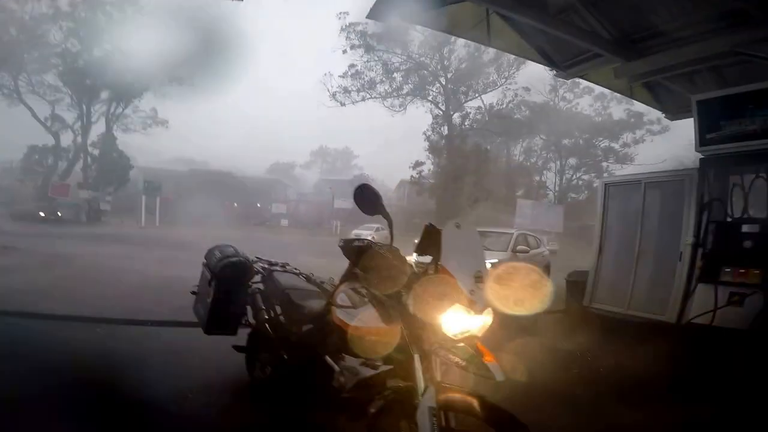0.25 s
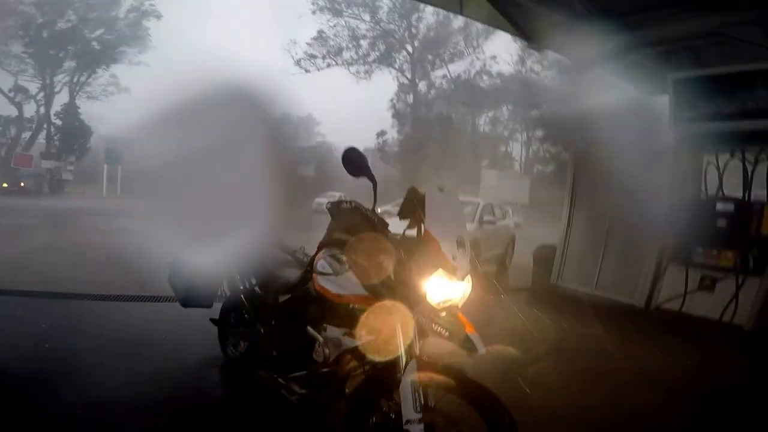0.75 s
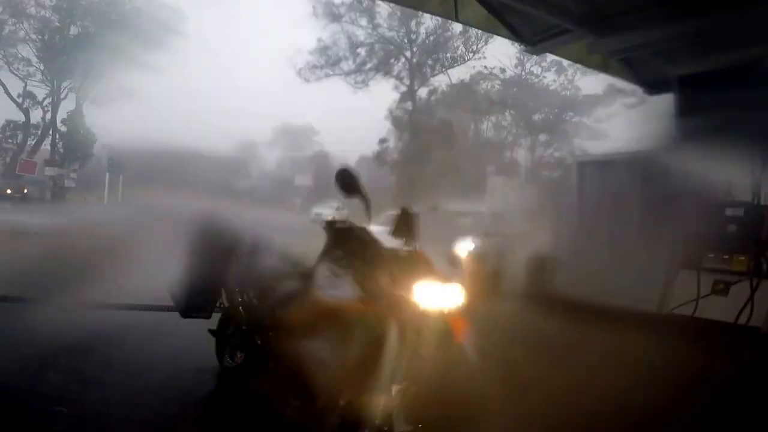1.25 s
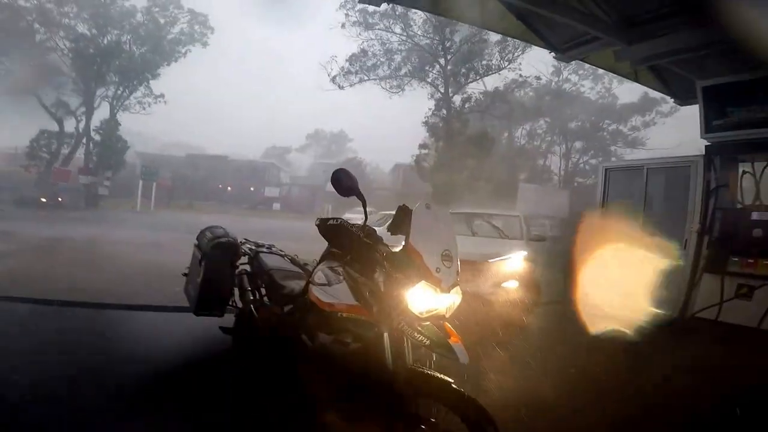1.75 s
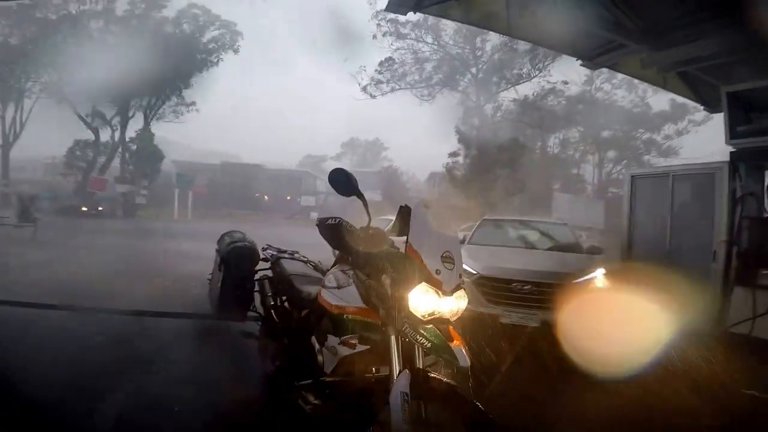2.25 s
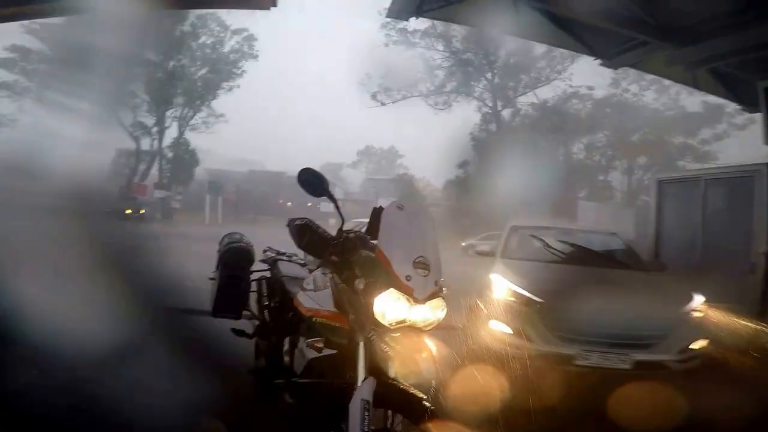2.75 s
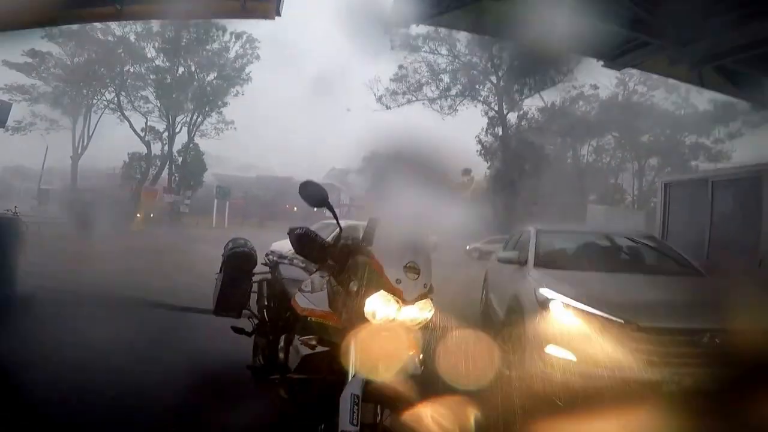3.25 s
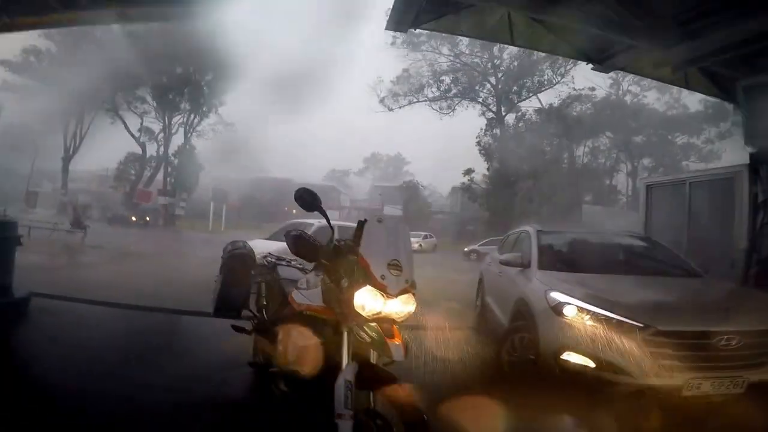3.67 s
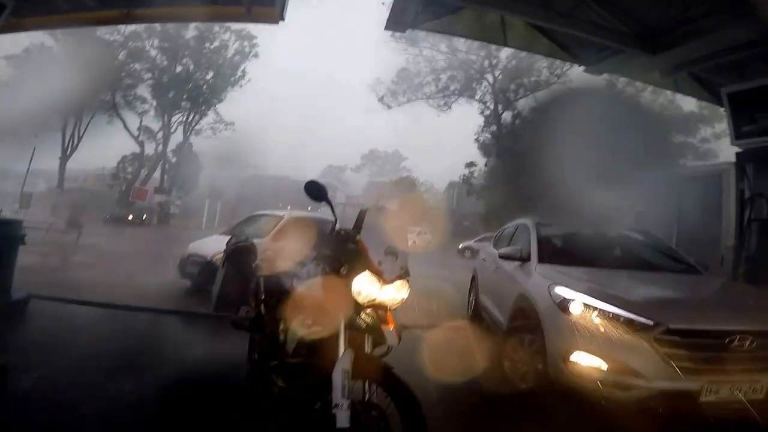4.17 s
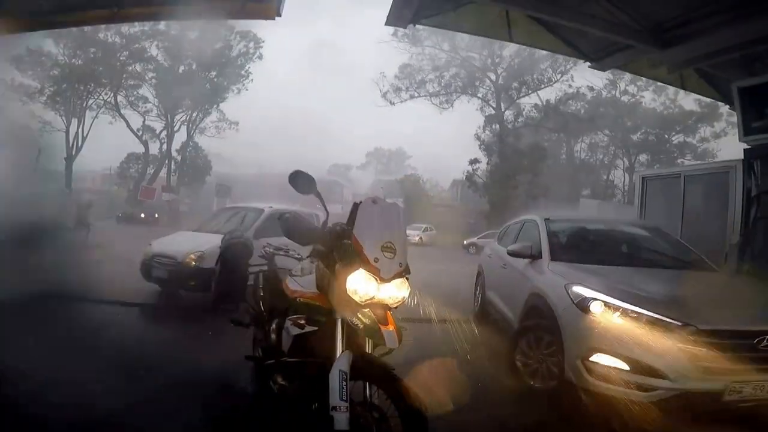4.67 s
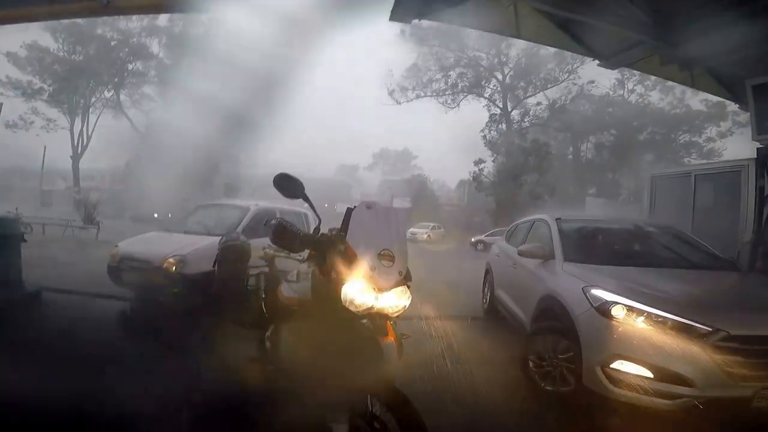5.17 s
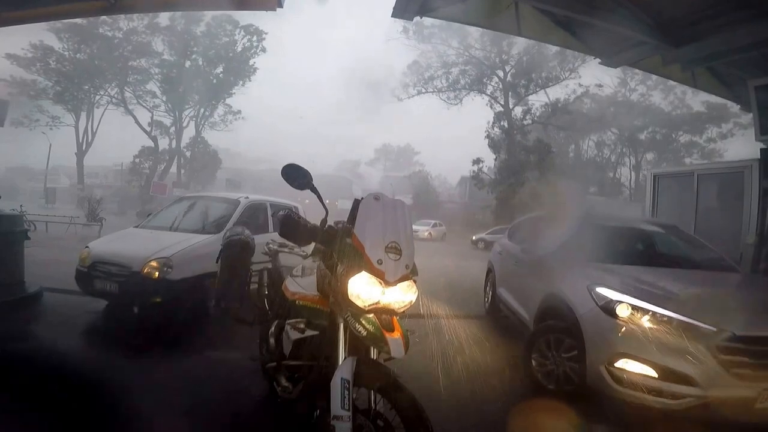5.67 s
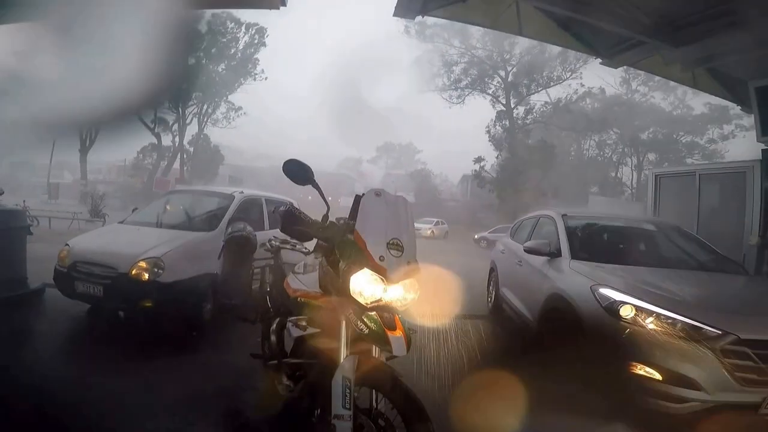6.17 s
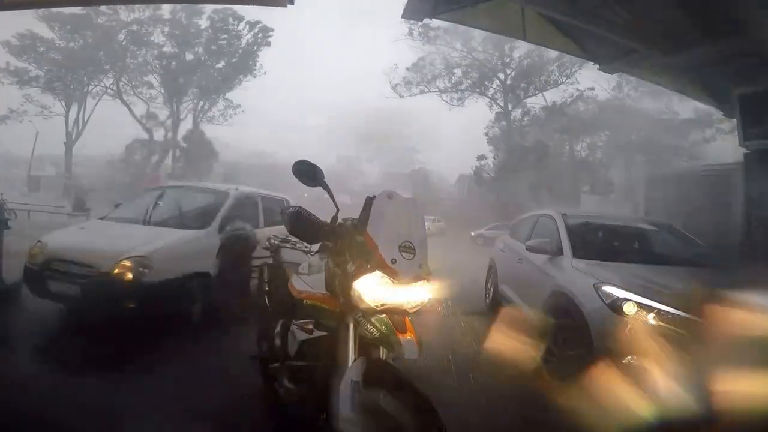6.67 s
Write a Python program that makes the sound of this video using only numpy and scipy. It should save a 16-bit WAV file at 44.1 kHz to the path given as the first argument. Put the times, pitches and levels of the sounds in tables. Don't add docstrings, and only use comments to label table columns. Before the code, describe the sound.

A dense boxy downpour roar with hail ticks and knocks, low wind buffeting, and a few violent blows that make the sound suddenly drop and recover.

```python
import sys
import numpy as np
from scipy import signal
from scipy.fft import rfft, irfft, next_fast_len
from scipy.io import wavfile
from scipy.ndimage import uniform_filter1d

SR = 44100
rng = np.random.default_rng(int(sys.argv[2]) if len(sys.argv) > 2 else 0)


def waveform_to_disk(signal):
    frames = np.transpose(np.atleast_2d(signal))
    scaled = np.clip(frames, -1, 1) * 32767
    samples = np.round(scaled).astype(np.int16)
    wavfile.write(sys.argv[1], SR, samples)


def magnitude_from_level(level_db):
    exponent = np.asarray(level_db, float) / 20
    return 10 ** exponent


N = 304731


def poisson(rate_hz, spread_db, top_db):
    when, sign, size = rng.random((3, N))
    size_db = np.minimum(-spread_db * np.log(1 - size), top_db)
    return (when < rate_hz / SR) * np.sign(sign - 0.5) * magnitude_from_level(size_db)


def colour(x, points):
    hz, db = np.transpose(points)
    size = next_fast_len(N + SR)
    log_hz = np.log(np.arange(size // 2 + 1) * SR / size + 1)
    log_gain = np.interp(log_hz, np.log(hz), db) * np.log(10) / 20
    cepstrum = irfft(log_gain, size)
    cepstrum[1:size // 2] *= 2
    cepstrum[size // 2 + 1:] = 0
    y = irfft(rfft(x, size) * np.exp(rfft(cepstrum)), size)[:N]
    return y / np.std(y)


def noise(points):
    return colour(rng.standard_normal(N), points)


def walk(rate_hz):
    hold = int(SR / rate_hz)
    steps = np.repeat(rng.standard_normal(N // hold + 1), hold)
    w = uniform_filter1d(uniform_filter1d(steps, hold), hold)[:N]
    return w / np.std(w)


def ring(x, hz, t60_s):
    pole = np.exp(2j * np.pi * hz / SR - np.log(1000) / (t60_s * SR))
    return signal.lfilter([1], [1, -pole], x).imag


def clock(length_s):
    return np.arange(int(length_s * SR)) / SR


def add(out, s, piece):
    i = int(s * SR)
    out[i:i + len(piece)] += piece[:N - i]


# (start [s], level [dB], length [s])
GUST_TABLE = [(0.01, -11.5, .17), (0.364, -8.5, 0.17), (0.833, -11.5, 0.043), (0.936, -17.5, 0.14),
              (1.184, -11.5, 0.21), (1.455, -15.5, 0.13), (1.66, -12, 0.087), (1.884, -14, .14),
              (2.062, -17.5, 0.14), (2.345, -19.5, 0.088), (2.51, -17, 0.21), (2.902, -12, 0.14),
              (3.175, -12.5, 0.028), (3.25, -17.5, 0.35), (3.636, -11.5, 0.18), (3.952, -20.5, 0.11),
              (4.183, -13, 0.14), (4.336, -16, 0.042), (4.577, -11, 0.45), (4.82, -11, 0.064),
              (5.09, -6, 0.085), (5.29, -14, 0.037), (5.407, -14, 0.04), (5.507, -16, 0.4),
              (6.18, -19, 0.084), (6.248, -11.5, 0.015), (6.36, -16, 0.046), (6.478, -11.5, 0.048),
              (6.582, -12.5, 0.072), (6.868, -13, .06)]
LULL_DB, GUST_RISE_S, GUST_FADE_S = -23, 0.016, 0.03


def gusts():
    t = np.arange(N) / SR
    power = magnitude_from_level(2 * LULL_DB)
    for s, db, length_s in GUST_TABLE:
        edge = np.minimum((t - s) / GUST_RISE_S, (s + length_s - t) / GUST_FADE_S)
        power = power + magnitude_from_level(2 * db) * np.exp(np.minimum(edge, 0))
    return np.sqrt(power)


# (frequency [Hz], level [dB per Hz])
RUMBLE_SPECTRUM = [(11, -35), (18, 1.5), (43, 2.5), (188, -14.5), (285, -18.5), (400, -22), (520, -26),
                   (880, -120)]
# (time [s], peak [dB], frequency [Hz])
BUFFETS = [(0.111, -5, 135), (0.162, -4.5, 210), (0.366, -4, 100), (0.458, -13, 136), (0.523, 1, 151),
           (0.832, -2, 120), (1.016, -6, 170), (1.097, -2.5, 151), (1.242, -4, 91.5), (1.348, 3, 92),
           (1.432, -5, 206), (1.471, -2, 131), (1.707, -6.5, 95), (1.877, -16, 104), (1.921, -5, 105),
           (2.634, -3.5, 118), (2.923, -5, 90), (3.174, -5, 98), (3.943, -10, 92), (4.243, -1.5, 95.5),
           (4.352, -4.5, 123), (4.562, -17, 165), (4.588, -2, 240), (5.076, -5, 122), (5.088, 0, 293),
           (5.422, -5, 234), (5.423, -6, 119), (6.373, -13, 127), (6.58, 0.5, 105)]
PORT_LIMIT = 0.85


def wind():
    eddies = rng.standard_normal(N) * magnitude_from_level(4.34 * walk(35)) + 12 * poisson(70, 3.7, 7.9)
    rumble = colour(eddies, RUMBLE_SPECTRUM)
    rumble = rumble / np.sqrt(uniform_filter1d(rumble ** 2, size=SR // 7) + 0.1)
    rumble = rumble - 0.19 * (np.minimum(rumble ** 2, 6.0) - 1)
    out = rumble * gusts()
    for s, db, hz in BUFFETS:
        cycles = np.arange(int(3 * SR / hz)) * hz / SR
        swing = np.sin(2 * np.pi * cycles) * cycles * np.exp(-cycles / 0.67)
        add(out, s, -2 * magnitude_from_level(db - 1) * swing)
    return PORT_LIMIT * np.tanh(out / PORT_LIMIT)


# (time [s], rattle [dB], rattle decay [s], thump [dB], thump frequency [Hz])
DIRECT_HITS = [
    (4.657, 4.5, 0.0029, 11, 42),
    (5.088, -37, .003, -17, 191),
    (5.1594, 5, 0.0014, -21, 60),
    (5.6186, 4.5, 0.0027, 5.5, 38),
    (5.7044, 19, 0.0016, -15, 61),
]


def blows():
    out, t = np.zeros(N), clock(0.08)
    bright = noise([(900, -51), (1800, -5), (2400, 0), (3200, -4), (4050, 0), (5000, -11),
                    (6000, -4), (8000, -16), (11000, -18.5), (15000, -47)])
    dull = noise([(200, -34), (600, 2), (1200, -23), (1750, -4.5), (2400, -2), (3500, -55)])
    for s, rattle_db, decay_s, thump_db, hz in DIRECT_HITS:
        i = slice(int(s * SR), int(s * SR) + len(t))
        rattle = bright[i] * np.exp(-t / (0.75 * decay_s))
        body = magnitude_from_level(-6) * dull[i] * t / decay_s * np.exp(-(t / (1.92 * decay_s)) ** 2)
        thump = np.sin(2 * np.pi * hz * t) * np.exp(-t / 0.03) * np.minimum(t / 0.0075, 1) ** 2
        add(out, s, magnitude_from_level(rattle_db) * rattle + magnitude_from_level(thump_db) * (thump + body))
    return out


# (time [s], peak [dB])
LIGHT_STONES = [(0.0313, -9), (0.407, -9), (0.679, -13), (0.9532, -7.5), (0.995, -8.5), (1.2266, -8),
                (1.5462, -12), (1.686, -5), (1.7, -6), (1.7375, -8), (1.923, -5.5), (1.9844, -9),
                (2.4155, -8), (2.538, -5), (3.082, -5), (3.2879, -9), (3.2978, -5.5), (3.348, -9),
                (4.2742, -11), (4.5204, -3), (4.805, -1), (5.4934, -18), (5.5385, -6), (5.571, -2),
                (6.2846, -27), (6.392, -3), (6.467, -15), (6.576, -2.5), (6.5999, -7), (6.6552, -10)]


def light_stones():
    out, t = np.zeros(N), clock(0.02)
    snap = noise([(3000, -26), (6500, 4), (10000, -6), (14000, -14), (16000, -40)])
    luck = rng.standard_normal((len(LIGHT_STONES), 3))
    for (s, db), (detune_low, detune_high, snap_luck) in zip(LIGHT_STONES, luck):
        low = np.sin(2 * np.pi * 2200 * (1 + 0.062 * detune_low) * t)
        high = np.sin(2 * np.pi * 2750 * (1 + 0.24 * detune_high) * t)
        knock = (low + 0.9 * high) * np.minimum(t / 0.00093, 1) * magnitude_from_level(-60 * t / 0.0077)
        burst = snap[int(s * SR):][:len(t)] * np.exp(-t / 0.0012)
        add(out, s, magnitude_from_level(db - 19 + 5.6 * snap_luck) * burst)
        add(out, s, magnitude_from_level(db + 1.5) * knock)
    return out


# (time [s], peak [dB], struck spot's frequency [Hz], crack [dB], unused: no shell mode takes it)
STONE_HITS = [(0.088, -6, 4200, -10), (0.4986, -2, 3400, -22), (0.7668, -3, 1610, -23),
              (0.9178, -6.5, 1280, -6), (1.1243, -10, 2300, 18), (1.6704, -5.5, 1600, -15),
              (1.8947, -6, 2000, -32), (2.0639, 3, 3530, -28), (2.1929, 1.5, 3860, -14),
              (2.5893, -3, 1400, -18), (2.6904, -4.5, 1600, -15), (2.7806, 2.5, 2200, -14),
              (2.8629, 5.5, 2300, -5), (3.1512, -4, 1300, -28), (3.2359, 4, 1590, -12),
              (3.3619, 7.5, 1500, -27), (3.402, 2.5, 2940, -18), (3.5413, -2, 3500, -18),
              (3.5741, 1, 1800, -19), (3.716, -2, 3300, -22), (4.508, -3.5, 1290, -15),
              (4.5509, -4.5, 3900, -9), (4.584, 5, 1930, -10), (5.414, -3, 2500, -6), (5.441, 1, 2360, -2),
              (5.4687, 0.5, 1900, -16), (6.426, -2, 2200, -4), (6.5126, -1.5, 3900, -26),
              (6.5319, -2, 2330, -23), (6.771, 2, 1460, -37)]
# (frequency [Hz], gain [dB], t60 [s], range [index, 3 = crack])
SHELL_MODES = [(1106, -3, 0.016, 0), (1400, -9, 0.011, -2), (2269, -2.5, 0.014, 1), (2550, 0, 0.0052, 1),
               (3874, -1, 0.012, 2), (3940, -14, 0.028, 2), (4920, -11, 0.0018, 2), (7100, 12, 0.0043, 2.5),
               (10620, 11.5, 0.0021, 1), (13300, -6, .003, -3)]
SPOT_DB_PER_OCTAVE = 9.5


def stones():
    out, t = np.zeros(N), clock(0.03)
    crack = noise([(600, -44), (1200, 13), (3000, 12.5), (6000, 1), (9000, -56), (16000, -44)])
    luck = rng.standard_normal((len(STONE_HITS), len(SHELL_MODES), 2))
    for (s, peak_db, spot_hz, crack_db), stone_luck in zip(STONE_HITS, luck):
        hit = np.zeros(len(t))
        for (hz, db, t60_s, kind), (level_luck, detune) in zip(SHELL_MODES, stone_luck):
            spot_db = crack_db if kind == 3 else -SPOT_DB_PER_OCTAVE * abs(np.log2(hz / spot_hz))
            tone = np.sin(2 * np.pi * hz * (1 + 0.056 * detune) * t)
            hit += magnitude_from_level(db + spot_db + 0.9 * level_luck) * tone * magnitude_from_level(-60 * t / (0.69 * t60_s))
        hit *= np.minimum(t / 0.0011, 1)
        burst = crack[int(s * SR):][:len(t)] * np.exp(-t / 0.0019) * np.minimum(t / 0.00013, 1)
        hit = hit / np.abs(hit).max() + 0.37 * burst
        add(out, s + 0.00037, hit * magnitude_from_level(peak_db - 2))
    return out


# (frequency [Hz], gain [dB], t60 [s])
SPRAY_MODES = [(5200, 7, .002), (7550, -2, 0.0017), (8000, 4, .002), (10000, -0.5, 0.0028),
               (11300, -5, .0015), (13000, -19, .0015)]
PELLETS_PER_S, SPITS_PER_S, FLURRY, PELLET_DB = 200, 140, 3, 6.5


def pellets(rain_db, hail_db):
    flurry = magnitude_from_level(FLURRY * (hail_db - rain_db - 1))
    grains = poisson(PELLETS_PER_S * flurry, 5, 14)
    shell = np.zeros(N)
    for hz, db, t60_s, _ in SHELL_MODES[1:5]:
        strikes = grains * rng.uniform(-0.76, 1, N)
        shell += ring(strikes, hz, 0.8 * t60_s) * magnitude_from_level(db - 7 * abs(np.log2(hz / 2400)))
    shell = uniform_filter1d(shell, size=4)
    spits = 0.6 * grains + poisson(SPITS_PER_S * flurry, 6, 17)
    splash = np.zeros(N)
    for hz, db, t60_s in SPRAY_MODES:
        splash += ring(spits * rng.uniform(-1, 1, N), hz, t60_s) * magnitude_from_level(db)
    return magnitude_from_level(rain_db) * (magnitude_from_level(PELLET_DB) * shell + magnitude_from_level(-14.5) * splash / np.std(splash))


# (frequency [Hz], level [dB per Hz])
BOOM_SPECTRUM = [(150, -33), (250, -18.5), (425, -8.5), (682, 3.5), (992, -10), (1080, -10), (1200, -14),
                 (1560, -18), (2640, -120)]
# (frequency [Hz], level [dB per Hz])
PATTER_SPECTRUM = [(590, -21), (1000, -23), (1140, -4), (1610, 0.5), (2060, -5), (2330, -6.5), (3300, -14),
                   (4290, -39), (7260, -120)]
# (frequency [Hz], level [dB per Hz])
HISS_SPECTRUM = [(2000, -27.5), (3200, -17.5), (3700, -0.5), (4300, 1), (5600, 0), (6600, -10.5),
                 (7100, -10), (8500, -16.5), (9100, -25), (10200, -31.5), (10900, -21), (13000, -23.5),
                 (15250, -32)]
# (frequency [Hz], level [dB per Hz])
HISS_END = [(15450, -95)]
BOOM_OVER_RAIN_DB, BOOM_PER_RAIN_DB = 8, 0.83


def roar(rain_db, hail_db):
    squall_db = 0.46 * walk(14)
    drops = poisson(900, 11.1, 16.4)
    mean_db = rain_db.mean()
    boom_db = BOOM_OVER_RAIN_DB + mean_db + BOOM_PER_RAIN_DB * (rain_db - mean_db)
    hiss = colour(rng.standard_normal(N) + 1.27 * drops, HISS_SPECTRUM + HISS_END)
    hiss *= magnitude_from_level(rain_db + 0.45 + 0.46 * walk(30))
    boom = noise(BOOM_SPECTRUM) * magnitude_from_level(boom_db + 1.66 + 1.2 * walk(20))
    patter = colour(rng.standard_normal(N) + 2.65 * drops, PATTER_SPECTRUM)
    patter *= magnitude_from_level(hail_db - 2.5 + 0.25 * walk(24.96))
    return magnitude_from_level(squall_db) * (hiss + boom + patter)


# (time [s], rain [dB], hail above the rain [dB])
DOWNPOUR = [(0.0, -29, 1.5), (0.45, -30.5, 0), (0.85, -32.5, 1.5), (1.1, -29, 1.5), (1.5, -31, 0),
            (2.05, -28.5, -0.5), (2.6, -26.5, -1.5), (3.0, -26.5, -1.5), (3.3, -27.5, 2.5), (3.6, -30, 3.5),
            (3.85, -28, -3), (4.15, -26, -2), (4.5, -26.5, 1), (5.0, -28.5, 2.5), (5.499, -25.5, 0.5),
            (6.05, -28, 2.5), (6.55, -27.5, 1), (6.91, -28.5, 3.5)]


def scene():
    s, rain, hail = np.transpose(DOWNPOUR)
    t = np.arange(N) / SR
    rain_db = np.interp(t, s, rain)
    hail_db = np.interp(t, s, rain + hail)
    shell = light_stones() + stones() + pellets(rain_db, hail_db)
    return (wind() + blows() + shell + roar(rain_db, hail_db))[None]


# (time [s], depth [dB], release [s])
GAIN_DUCKS = [
    (4.663, -20, 5.051),
    (5.098, -15, 5.39),
    (5.625, -22.5, 5.983),
    (5.711, -4.5, 5.84),
    (6.0, -4, 6.16),
]
DUCK_ATTACK_S, DUCK_CREEP_DB_PER_S, DUCK_RELEASE_DB_PER_S = 0.0035, 7, 480


def gain_db():
    t = np.arange(N) / SR
    total_db = np.zeros(N)
    for s, depth_db, release_s in GAIN_DUCKS:
        creep_db = DUCK_CREEP_DB_PER_S * (t - s)
        climb_db = DUCK_RELEASE_DB_PER_S * np.maximum(t - release_s, 0)
        attack = 1 - np.exp(-np.maximum(t - s, 0) / DUCK_ATTACK_S)
        total_db += np.minimum(depth_db + creep_db + climb_db, 0) * attack
    return total_db


def top_cut(x):
    return signal.sosfilt(signal.butter(12, 15400, fs=SR, output="sos"), x)


CEILING = 0.78


def record(dry):
    x = signal.sosfilt(signal.butter(2, 18, "high", fs=SR, output="sos"), dry)
    x = x * magnitude_from_level(gain_db())
    x = x / (1 + np.abs(x / CEILING) ** 6) ** (1 / 6)
    x = signal.sosfilt(signal.ellip(4, 0.2, 35, 16200, fs=SR, output="sos"), x)
    return top_cut(x)


dry = scene()
out = record(dry)
waveform_to_disk(out)
```